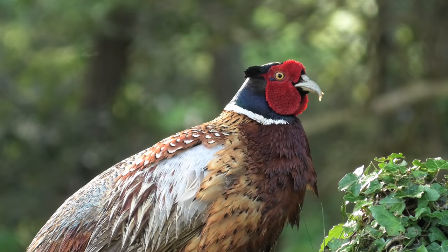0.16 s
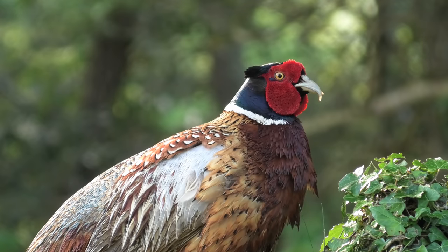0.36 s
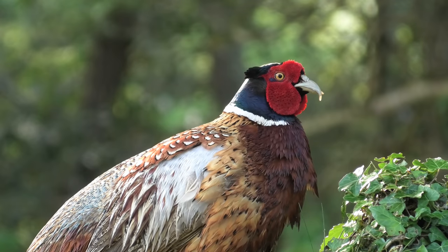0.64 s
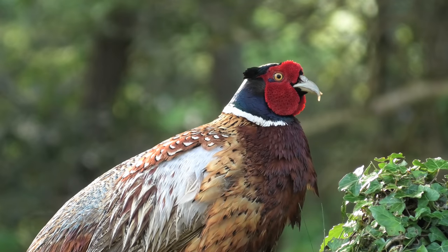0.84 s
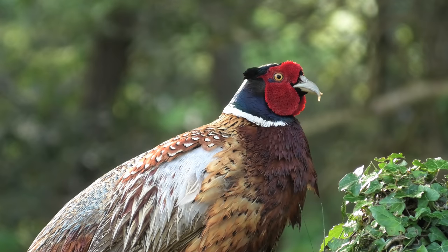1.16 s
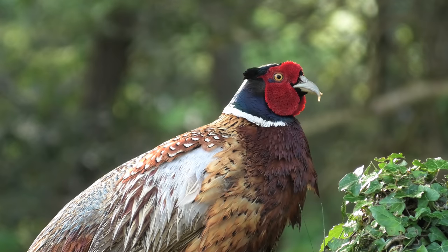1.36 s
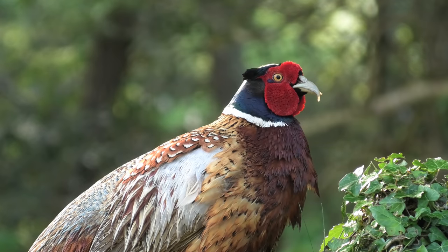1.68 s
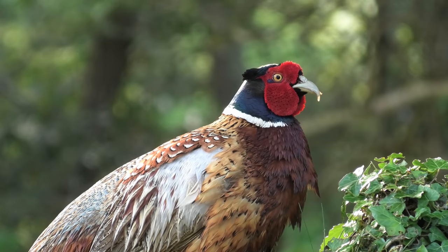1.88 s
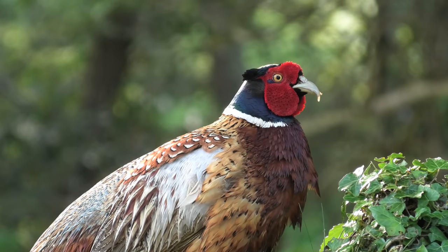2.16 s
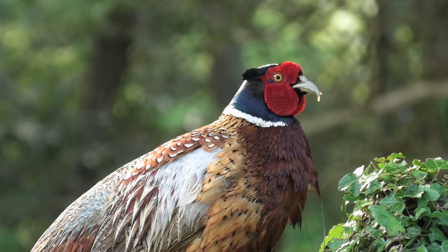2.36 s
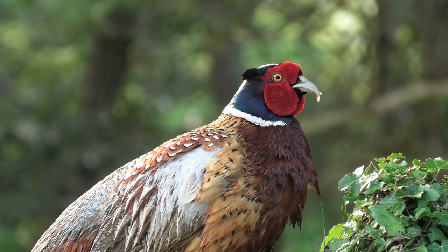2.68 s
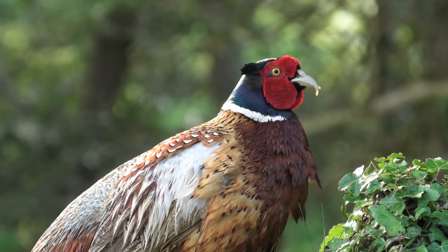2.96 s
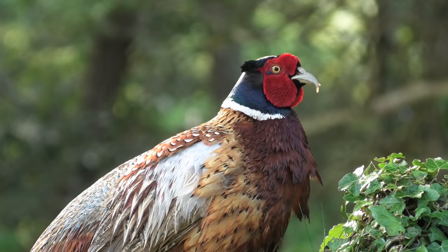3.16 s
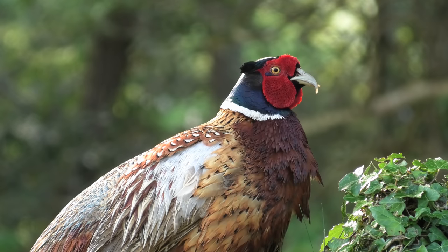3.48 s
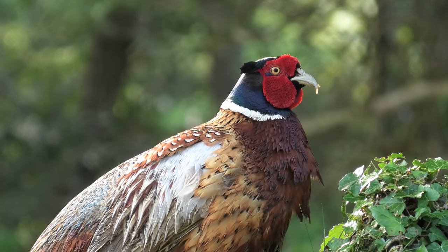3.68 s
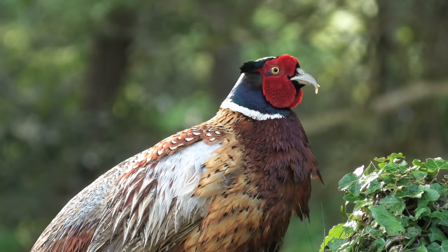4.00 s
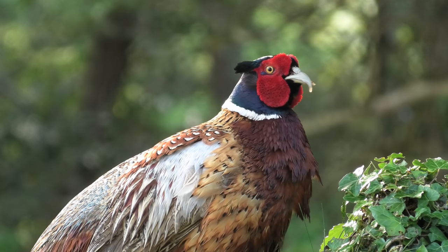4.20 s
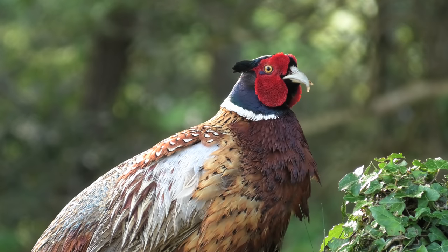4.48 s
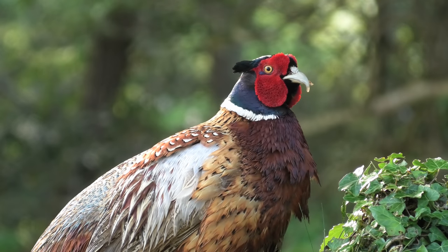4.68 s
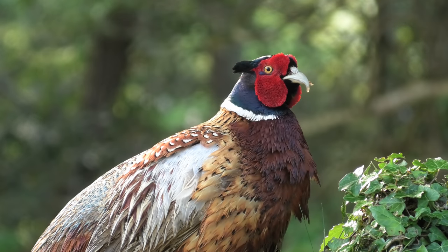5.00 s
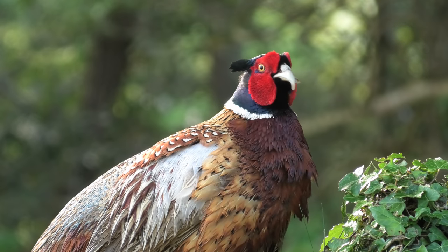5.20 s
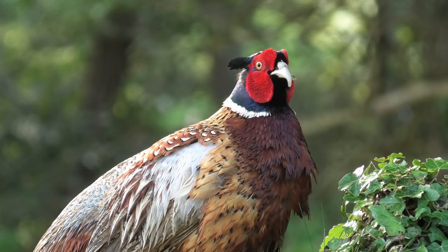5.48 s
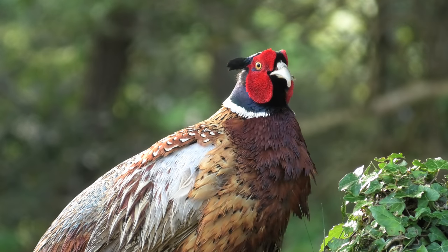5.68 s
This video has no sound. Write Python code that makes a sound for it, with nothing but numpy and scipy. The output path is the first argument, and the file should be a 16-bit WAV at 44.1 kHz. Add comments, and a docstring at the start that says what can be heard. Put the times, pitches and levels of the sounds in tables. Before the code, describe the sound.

Short throaty purring rattles from a nearby pheasant stand out over songbird trills, thin whistles and a distant woodland bird chorus.

```python
"""A cock pheasant close by gives seven short purring calls in a spring wood, each a rattle that breaks up at its end.
A songbird sings its trilling song twice among other chirps, with crows, a pigeon and a wash of far birds beyond.
Birds are harmonic stacks on pitch curves roughened by chance; twigs and air are noise; the wood is a
convolved scatter of random taps. Source levels are stated ahead of the wood and the filters."""
import sys
import numpy as np
from scipy import signal
from scipy.fft import rfft, irfft
from scipy.io import wavfile

SR = 44100
rng = np.random.default_rng(int(sys.argv[2]) if len(sys.argv) > 2 else 0)


def int16_out(signal):
    """Quantize to a 16-bit WAV file."""
    q = np.round(np.clip(np.atleast_2d(signal).T, -1, 1) * 32767)
    wavfile.write(sys.argv[1], SR, q.astype(np.int16))


N = 257969  # length [samples]


def gain_of(db):
    """Decibels to an amplitude factor."""
    return 10 ** (np.asarray(db) / 20)


def evened(x):
    """Scales to rms 1."""
    return x / np.sqrt(np.mean(x ** 2) + 1e-20)


def read(points, hz):
    """Interpolates a (frequency, value) table on a log-frequency axis."""
    table_hz, value = np.transpose(points)
    return np.interp(np.log(hz + 1), np.log(table_hz + 1), value)


def add(mix, start_s, sound):
    """Mixes a sound in at start_s, cut off at the end of the mix."""
    part = mix[max(round(start_s * SR), 0):][:len(sound)]
    part += sound[:len(part)]


def wobble(count, rate_hz):
    """Random curve of size about 1: straight lines between rate_hz Gaussian knots a second."""
    knots = rng.standard_normal(4096)
    return np.interp(np.arange(count) * rate_hz / SR, np.arange(4096), knots)


def noise(spectrum):
    """Coloured stereo noise at rms 1; channels nearly alike in the middle range, less in the bass and at 5-8 kHz."""
    # left-right likeness: (frequency [Hz], correlation)
    likeness = [(30, 0.3), (120, 0.66), (300, 0.95), (2000, 0.99), (5000, 0.62), (8000, 0.71), (13000, 1)]
    size = 2 ** 18
    hz = np.fft.rfftfreq(size, 1 / SR)
    a, b = rfft(rng.standard_normal((2, size)))
    same = np.clip(read(likeness, hz), -1, 1)
    mid = a * np.sqrt(1 + same)
    side = b * np.sqrt(1 - same)
    colour = gain_of(read(spectrum, hz))
    return evened(irfft(np.array([mid + side, mid - side]) * colour)[:, :N])


def wood(x, direct_db, wet_db, build_s, width, early_db=-100, early_s=.02):
    """Direct sound plus the scatter of trunks and leaves, which builds up over build_s and dies away."""
    # decay of the wood: (frequency [Hz], t60 [s])
    decay = [(300, 1), (1000, 0.51), (2000, 0.48), (5000, 0.79), (9000, 0.26)]
    taps_per_s = 3000
    taps = rng.standard_normal((2, SR)) * (rng.random((2, SR)) < taps_per_s / SR)
    hz, t, bands = signal.stft(taps, SR, nperseg=256)
    late = gain_of(-60 * t / read(decay, hz)[:, None])
    early = gain_of(early_db) * np.exp(-t / early_s)
    build = np.minimum(t / build_s, 1) ** 2
    tail = signal.istft(bands * (late + early) * build, SR, nperseg=256)[1]
    tail = tail / np.linalg.norm(tail[0])
    mid, side = signal.fftconvolve(x[None], tail, axes=1)[:, :N]
    wet = np.array([mid + width * side, mid - width * side])
    return gain_of(direct_db) * x + gain_of(wet_db) * wet


def voice(hz, harmonics_db):
    """A stack of harmonics on a pitch curve."""
    phase = 2 * np.pi * np.cumsum(hz) / SR
    return sum(gain_of(db) * np.sin(k * phase) for k, db in enumerate(harmonics_db, 1))


def sing(rows, harmonics_db, buzz_octaves, buzz_hz, edge):
    """Each note bends through three pitches; a fast random flutter of the syrinx roughens it."""
    out = np.zeros(N)
    for start_s, length_s, first_hz, middle_hz, last_hz, db in rows:
        u = np.linspace(0, 1, int(length_s * SR))
        bend = np.polyfit([0, .5, 1], np.log([first_hz, middle_hz, last_hz]), 2)
        hz = np.exp(np.polyval(bend, u)) * 2 ** (buzz_octaves * wobble(len(u), buzz_hz))
        envelope = signal.windows.tukey(len(u), np.clip(edge, 0, 1))
        add(out, start_s, gain_of(db) * voice(hz, harmonics_db) * envelope)
    return out


def glides(rows, early):
    """Gives each note its middle pitch: the share early of its glide is done by half time."""
    return [(start_s, length_s, first_hz, first_hz * (last_hz / first_hz) ** early, last_hz, db)
            for start_s, length_s, first_hz, last_hz, db in rows]


def air():
    """Steady coloured noise of the open air."""
    # (frequency [Hz], relative level [dB])
    air_spectrum = [(15, -56), (25, -29), (130, -22), (277, -9), (531, -3.5), (840, -5), (1070, 2),
                    (1370, -24), (1940, -2), (2480, -15.5), (4870, -18.5), (8140, -23.5), (11900, -21.5),
                    (14400, -31), (16000, -41)]
    air_db = -54.5
    return gain_of(air_db) * noise(air_spectrum)


def flock(lowest_hz, length_s, fall, count):
    """Overlapping cries of many far birds, spread over an octave; they rise where fall is negative."""
    when, pitch, size = rng.random((count, 3)).T
    cries = [(start_s, length_s, hz * (1 + fall), hz, hz * (1 - fall), db)
             for start_s, hz, db in zip(when * N / SR, lowest_hz * 2 ** pitch, -6 * size)]
    return evened(sing(cries, [0], buzz_octaves=0.026, buzz_hz=343.6, edge=0.75))


def chorus(flicker_db=1.03):
    """Low and high far voices swell and ebb: part blurred to a noise wash, part still single cries."""
    # (time [s], low voices [dB], high voices [dB])
    swells = [(0, -46, -64.5), (.35, -49.5, -67), (.6, -45.5, -58), (1.05, -46, -76), (1.3, -55, -67),
              (1.548, -59, -72), (2.2, -56, -62), (2.75, -47.5, -68), (3.05, -54.5, -59.5),
              (3.9, -59.5, -62.5), (4.55, -63.5, -66.5), (4.7, -52, -52), (5.05, -47.5, -48.5),
              (5.25, -54.5, -63), (5.45, -45, -46.5), (5.85, -47.5, -58)]
    # wash of the low voices: (frequency [Hz], relative level [dB])
    low_spectrum = [(150, -28), (400, -15), (800, -10.5), (1100, -2), (1400, -3), (1900, -4.5),
                    (2500, -16.5), (4000, -33.5)]
    # wash of the high voices: (frequency [Hz], relative level [dB])
    high_spectrum = [(1500, -30), (2600, -8.5), (3200, -2.5), (4500, -1), (5600, -14.5), (7000, -13),
                     (9000, -31)]
    at_s, low_db, high_db = np.transpose(swells)
    t = np.arange(N) / SR
    cries = flock(lowest_hz=1052, length_s=0.1402, fall=0.041, count=110)
    twitter = flock(lowest_hz=2900, length_s=0.0432, fall=-0.0618, count=330)
    twitter = wood(twitter, direct_db=-20, wet_db=0, build_s=.005, width=.16)
    low = .85 * noise(low_spectrum) + .52 * cries
    high = .85 * noise(high_spectrum) + .5 * twitter
    low_gain = gain_of(np.interp(t, at_s, low_db) + flicker_db * wobble(N, 24.85))
    high_gain = gain_of(np.interp(t, at_s, high_db))
    return low * low_gain + high * high_gain


def trill(start_s, stretch, song_db, flutter=0.0204, stray=.006):
    """One mainly rising syllable, sung about nine times a second, a little lower and softer each time."""
    # one syllable: (time after its start [s], pitch [Hz], relative level [dB])
    syllable = [(0, 2850, -30), (.008, 2952, -9), (0.022, 3190, -4), (.029, 4030, -0.5), (.037, 4666, 2),
                (.048, 4777, -1), (0.06, 5000, -32), (.067, 5486, .5), (0.082, 5780, -9.5),
                (.105, 5540, -8)]
    # syllable starts: (time after the song's start, before stretch [s])
    syllable_starts = [.72, .837, .947, 1.053, 1.162, 1.291]
    first_db, fade_db, sag = -38, 0.76, 0.0051  # fade and share of pitch lost are per syllable
    at_s, pitch_hz, level_db = np.transpose(syllable)
    t = np.arange(0, at_s[-1], 1 / SR)
    out = np.zeros(N)
    for k, offset_s in enumerate(syllable_starts):
        drift = 1 - sag * k + flutter * wobble(len(t), 511) + stray * wobble(len(t), 59.4)
        hz = np.interp(t, at_s, pitch_hz) * drift
        db = song_db + first_db - fade_db * k + np.interp(t, at_s, level_db)
        add(out, start_s + stretch * offset_s, gain_of(db) * voice(hz, [0, -38]))
    return out


def song(start_s, stretch, song_db):
    """A few separate notes, mostly upsweeps, lead into the trill; stretch spaces the note starts."""
    # (time after the song's start, before stretch [s], length [s], first [Hz], last [Hz], level before song_db [dB])
    opening_notes = [(0, 0.03, 4660, 5430, -47), (.005, 0.024, 5920, 6740, -49),
                     (0.09, 0.016, 2900, 3230, -46), (0.193, 0.029, 3030, 4200, -43.5),
                     (.281, 0.022, 4230, 5010, -45.5), (0.476, 0.053, 5680, 5570, -48.5),
                     (0.51, 0.018, 3030, 5000, -41.5), (0.564, 0.045, 3044, 4360, -42),
                     (0.63, 0.064, 4850, 5530, -46.5), (0.634, 0.014, 6050, 6680, -48)]
    notes = [(start_s + stretch * offset_s, length_s, first_hz, last_hz, song_db + db)
             for offset_s, length_s, first_hz, last_hz, db in opening_notes]
    opening = sing(glides(notes, early=.75), [0, -38], buzz_octaves=0.021, buzz_hz=722, edge=0.31)
    return opening + trill(start_s, stretch, song_db)


def songbird():
    """The nearest songbird sings one song twice."""
    # (time [s], time stretch, level offset [dB])
    songs = [(.003, 1.0, 0), (4.976, 0.98, 1)]
    return sum(song(*row) for row in songs)


def chips():
    """Sharp high chips: a flick upward, then a short high buzz."""
    # (time [s], level [dB])
    chip_rows = [(0.399, -42.5), (.665, -39.5), (4.649, -39.5), (5.451, -52.5)]
    flick_s, from_hz, to_hz = .015, 5550, 7800
    buzz_delay_s, buzz_s, end_hz, buzz_db = .008, 0.069, 6820, -9.5  # buzz_db is relative to the flick
    flicks = [(start_s, flick_s, from_hz, to_hz, db) for start_s, db in chip_rows]
    ends = [(start_s + buzz_delay_s, buzz_s, end_hz, end_hz, end_hz, db + buzz_db)
            for start_s, db in chip_rows]
    return (sing(glides(flicks, early=.62), [0], buzz_octaves=0.019, buzz_hz=710, edge=0.26)
            + sing(ends, [0], buzz_octaves=0.076, buzz_hz=900, edge=0.3))


def whistles():
    """Drawn-out whistles that swell and sink evenly."""
    # (time [s], length [s], first [Hz], last [Hz], level [dB])
    whistle_rows = [(.9, 0.19, 2870, 2310, -55), (1.39, 0.077, 3100, 2785, -55),
                    (2.82, 0.13, 6380, 7270, -62.5), (3.02, .08, 4890, 4730, -58),
                    (3.62, .11, 4440, 4300, -50), (3.94, 0.059, 4850, 4770, -49.5),
                    (4.59, 0.14, 4690, 3670, -49.5), (4.725, .055, 4066, 4035, -41),
                    (4.94, 0.091, 4070, 4038, -40.5), (5.045, 0.2, 6680, 5210, -38),
                    (5.27, 0.13, 6820, 6730, -58)]
    return sing(glides(whistle_rows, early=.55), [0, -38], buzz_octaves=0.012, buzz_hz=726, edge=0.58)


def crows():
    """Far crows: cawing stacks of five harmonics, strongly roughened."""
    # (time [s], length [s], first [Hz], middle [Hz], last [Hz], level [dB])
    caws = [(.95, 0.27, 700, 682, 624, -63), (2.52, .36, 595, 641, 715, -56),
            (4.65, 0.15, 520.7, 548, 517, -53), (4.945, 0.057, 734, 758, 757, -49.5),
            (5.305, .1, 817, 763, 718, -48), (5.755, 0.093, 830, 781, 678, -50)]
    # levels of harmonics 1 to 5: [dB]
    caw_harmonics_db = [-10.5, 2.5, 1, -5.5, -10]
    return sing(caws, caw_harmonics_db, buzz_octaves=.07, buzz_hz=300, edge=.4)


def twigs(decay_s=0.0011, dull_hz=6500):
    """Twigs ticking: tiny dry snaps of decaying, band-passed noise."""
    # (time [s], level before the band-pass [dB])
    ticks = [(1.458, -30.5), (1.612, -36.5), (2.242, -42), (3.533, -35.5)]
    t = np.arange(SR // 100) / SR
    out = np.zeros(N)
    for start_s, db in ticks:
        add(out, start_s, gain_of(db) * rng.standard_normal(len(t)) * np.exp(-t / decay_s))
    return signal.sosfilt(signal.butter(1, [1500, dull_hz], "band", fs=SR, output="sos"), out)


def rattle(start_s, pulses, spacing_s, first_length_s, db, fade_db, hold, top_hz, scoop, fall):
    """Evenly spaced pulses scoop up to pitch, lengthen, then sink and fade; yields one row a pulse."""
    collapse = 3.1  # the pitch holds, then gives way as this power of the progress
    widen_s = 0.001206  # added length per pulse
    scoop_db_per_octave = 15.5  # a first pulse that starts flat is also weaker
    uneven_db = 1.04  # chance in the strength of a pulse
    # glide inside a pulse: share of the scoop upward; sag plus share of the fall downward
    lift, sag_octaves, slip = 0.26, .12, 0.405
    count = round(pulses)
    for k in range(count):
        progress = k / (count - 1)
        flat_octaves = scoop * (k == 0)
        level_db = db - scoop_db_per_octave * flat_octaves - fade_db * progress ** hold
        level_db += uneven_db * rng.standard_normal()
        hz = top_hz * 2 ** (-flat_octaves - fall * progress ** collapse)
        glide_octaves = lift * flat_octaves - (sag_octaves + slip * fall) * progress
        yield start_s + k * spacing_s, first_length_s + k * widen_s, level_db, hz, glide_octaves


def pheasant(steady=0.081, breakup=0.88, jitter_octaves=0.18, shimmer=1.05, arch_octaves=0.0576,
             rasp_db=-19, chest_db=20, press_db=22, easy_hz=950):
    """The syrinx opens about 38 times a second; each opening is a short tone that sags at both ends."""
    # one row a rattle; the two long calls are two rattles run together:
    # (time [s], pulses, pulse spacing [s], first pulse's length [s], level [dB], final fade [dB],
    #  hold [power of the progress by which the level gives way], top pitch [Hz],
    #  opening scoop [octaves], final fall [octaves])
    rattles = [ (1.635, 4, 0.024, 0.013, -22, 5, 1.2, 971, 0.013, 0.049),
               (1.734, 6, 0.026, .015, -24.5, 22, 3.5, 957, 0, .53),
               (2.072, 6, 0.026, .012, -23, 20.5, 4.1, 1056, 0.29, .7),
               (2.578, 5, .026, .016, -23, 15, 3, 999.4, 0.097, .37),
               (3.16, 4, 0.026, .017, -21.5, 6.5, 2.6, 981, 0.18, 0.22),
               (3.269, 3, 0.031, 0.021, -27.5, 5, 3.5, 862, 0.014, .1),
               (3.579, 6, .0255, .0108, -18, 26, 3.33, 1026, .18, 0.557),
               (4.793, 5, .0256, 0.015, -19.3, 19, 2.1, 920, 0.0375, 0.368),
               (5.423, 4, 0.031, 0.019, -25.5, 8, 4.7, 884, 0.069, 0.254)]
    # base levels of harmonics 1 to 6, the throat favours the second: [dB]
    purr_harmonics_db = [-15, -1.5, -26.5, -34.5, -35, -36.5]
    out = np.zeros(N)
    pulses = (pulse for row in rattles for pulse in rattle(*row))
    for start_s, length_s, db, hz, glide in pulses:
        span = np.linspace(-2, 2, int(2 * length_s * SR))  # the pulse proper lies between -1 and 1
        u = np.tanh(span) / np.tanh(1)
        rough = steady + breakup * abs(glide)  # the voice breaks where its pitch slips
        octaves = glide * u / 2 + arch_octaves * (1 / 5 - u ** 4)
        octaves += jitter_octaves * rough * wobble(len(u), 948)
        first_db = purr_harmonics_db[0] + chest_db * abs(glide)  # and the fundamental comes forward
        bright_db = press_db * np.log2(hz / easy_hz)  # pressed higher, the voice grows harsher
        upper_db = np.array(purr_harmonics_db[2:]) + bright_db
        tone = voice(hz * 2 ** octaves, [first_db, purr_harmonics_db[1], *upper_db])
        tone = tone * (1 + shimmer * rough * wobble(len(u), 1310))
        rasp = gain_of(rasp_db + bright_db) * rough * wobble(len(u), 10000)
        opening = np.exp(-(span / .92) ** 4) * (1 - .2 * u ** 2)
        add(out, start_s - length_s / 2, gain_of(db) * (tone + rasp) * opening)
    return signal.sosfilt(signal.butter(2, 330, "high", fs=SR, output="sos"), out)


def pigeon():
    """Wood pigeon: low coos with a weak second harmonic and a slower flutter."""
    # (time [s], length [s], first [Hz], middle [Hz], last [Hz], level [dB])
    coos = [(1.98, 0.38, 474.3, 464.6, 432, -56.5), (5.0, 0.11, 457, 425.5, 418, -45.5),
            (5.38, 0.0487, 435, 444, 436, -48)]
    return sing(coos, [0, -22], buzz_octaves=0.057, buzz_hz=77.0, edge=0.44)


def clear_notes():
    """Level pips, upsweeps, and slurs that drop quickly and level off, mostly from other birds among the trees;
    the upsweep at 5.43 s is the nearest songbird's own note in its second song."""
    # (time [s], level [dB])
    pip_rows = [(2.801, -55), (3.778, -46.5), (4.497, -45.5)]
    # (time [s], length [s], first [Hz], last [Hz], level [dB])
    upsweeps = [(2.16, .06, 5550, 5720, -57.5), (4.59, 0.01, 3000, 4770, -45.5),
                (5.43, 0.0288, 5160, 5820, -41)]
    # (time [s], length [s], first [Hz], last [Hz], level [dB])
    slurs = [(3.0, 0.08, 4240, 4030, -55), (3.255, 0.085, 6600, 5820, -55), (3.31, 0.052, 5320, 3610, -52),
             (3.46, 0.099, 6750, 5300, -56), (3.93, .024, 6700, 4850, -50), (4.03, .058, 4800, 3840, -53.5),
             (4.27, 0.04, 6940, 5660, -50.5), (4.31, .041, 5500, 3700, -47.5),
             (4.58, 0.057, 6600, 5740, -48), (5.36, 0.031, 5050, 4694, -41.5),
             (5.67, 0.044, 5330, 4950, -36.5)]
    pip_s, pip_hz = 0.026, 3030
    pips = [(start_s, pip_s, pip_hz, pip_hz, pip_hz, db) for start_s, db in pip_rows]
    notes = pips + glides(upsweeps, early=0.657) + glides(slurs, early=.85)
    return sing(notes, [0, -38], buzz_octaves=.013, buzz_hz=730, edge=0.19)


def far_series(start_s=2.28, gap_s=0.09, db=-57, count=6):
    """A far songbird repeats one falling note; gives its note rows."""
    return [(start_s + k * gap_s, .05, 5700, 5000, 4500, db) for k in range(count)]


def harsh_notes():
    """The far series and other buzzing notes, roughened by a wide, fast flutter."""
    # (time [s], length [s], first [Hz], last [Hz], level [dB])
    buzzes = [(3.71, 0.07, 6400, 4480, -53.5), (3.96, 0.063, 7170, 6600, -55),
              (4.18, .078, 6420, 4640, -54.5), (4.37, .14, 4490, 5370, -56.5),
              (4.88, 0.12, 5020, 4820, -44.5)]
    notes = glides(buzzes, early=.48) + far_series()
    return sing(notes, [0], buzz_octaves=.077, buzz_hz=900, edge=.27)


def scene():
    """Songbirds, far crows and pigeon ring strongly in the trees; the near pheasant is drier."""
    songbirds = songbird() + chips() + whistles() + clear_notes() + harsh_notes()
    canopy = wood(songbirds, direct_db=-5.5, wet_db=-.5, build_s=0.0042, width=.16,
                  early_db=5.5, early_s=0.023)
    far = wood(crows() + pigeon(), direct_db=-2, wet_db=-0.5, build_s=0.0027, width=0.047,
               early_db=13, early_s=0.068)
    near = wood(pheasant(), direct_db=-0.5, wet_db=-9.0, build_s=0.026, width=0.1)
    return air() + chorus() + canopy + far + twigs() + near


def record(dry):
    """Band limit: a steep linear-phase low-pass."""
    edge_hz = 15850
    lowpass = signal.firwin(511, edge_hz, window=("kaiser", 9), fs=SR)
    return signal.oaconvolve(dry, lowpass[None], "same")


dry = scene()
out = record(dry)
int16_out(out)
```